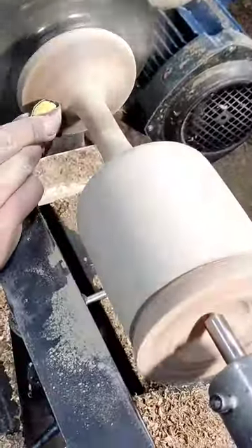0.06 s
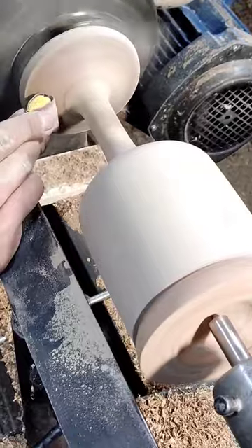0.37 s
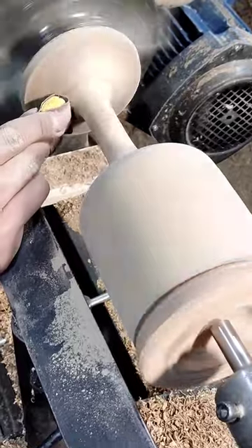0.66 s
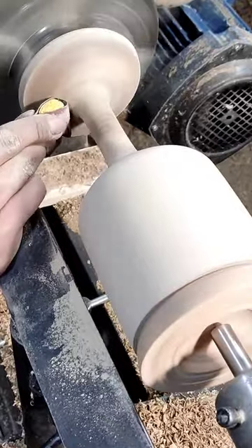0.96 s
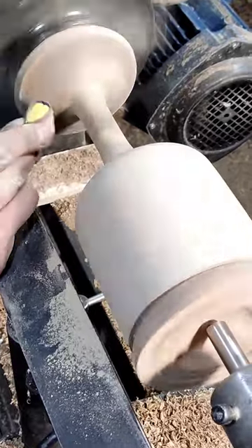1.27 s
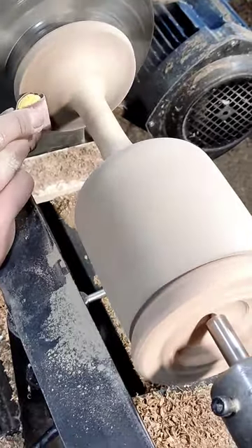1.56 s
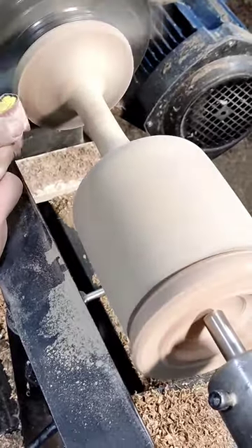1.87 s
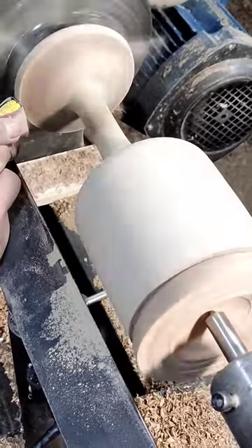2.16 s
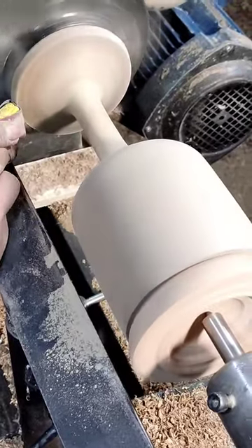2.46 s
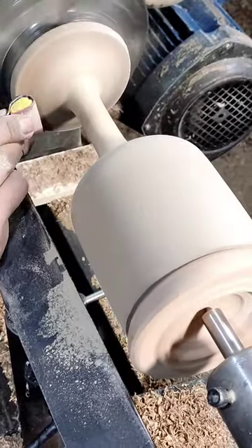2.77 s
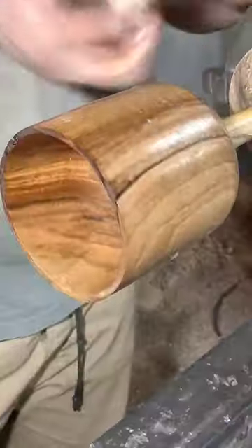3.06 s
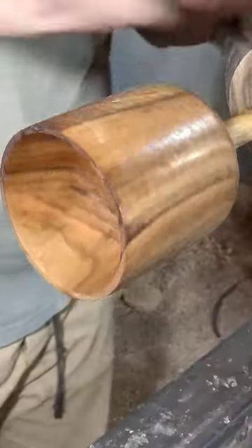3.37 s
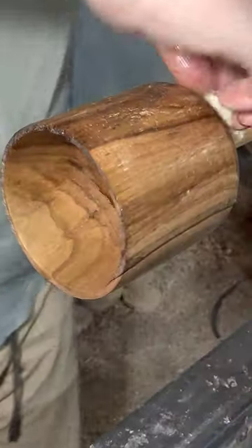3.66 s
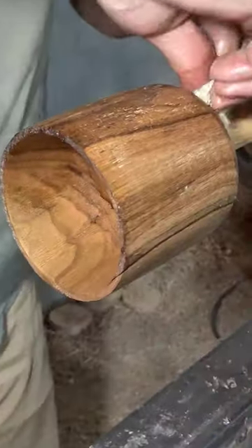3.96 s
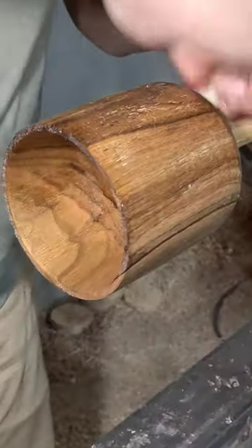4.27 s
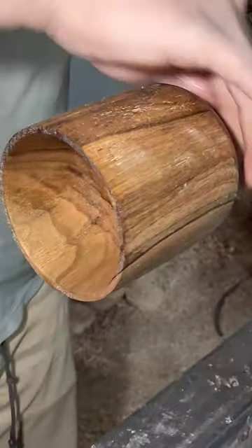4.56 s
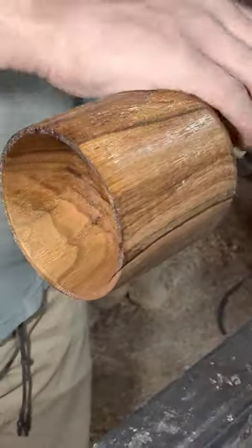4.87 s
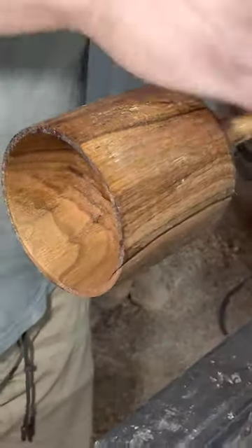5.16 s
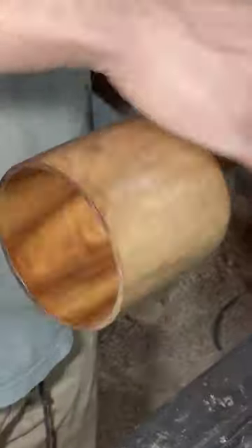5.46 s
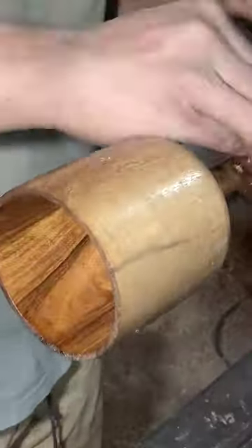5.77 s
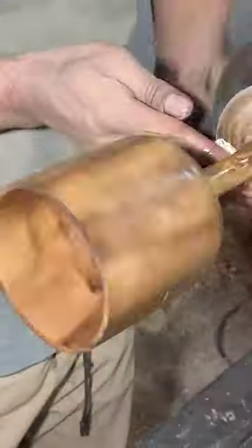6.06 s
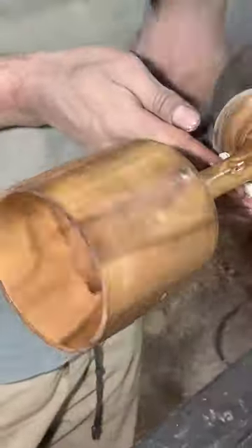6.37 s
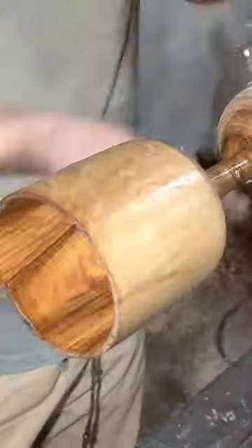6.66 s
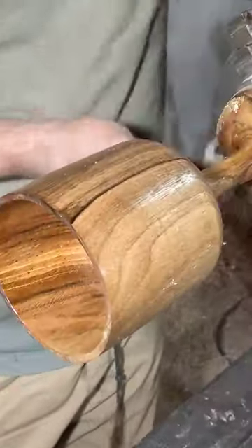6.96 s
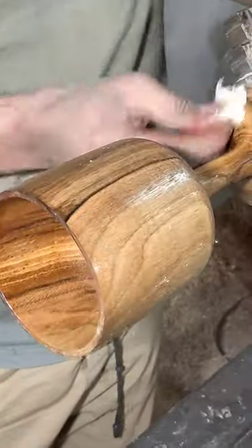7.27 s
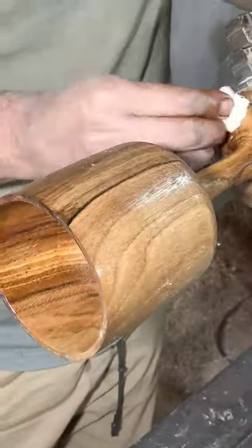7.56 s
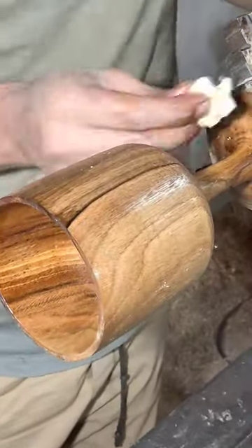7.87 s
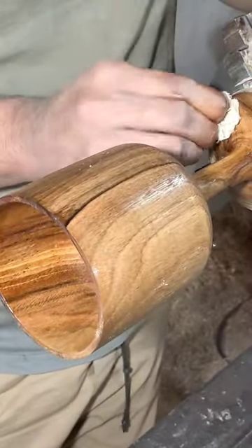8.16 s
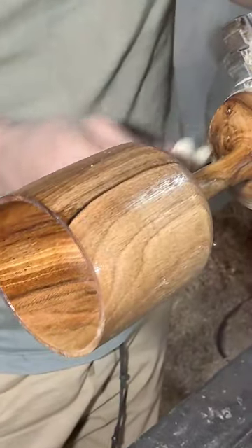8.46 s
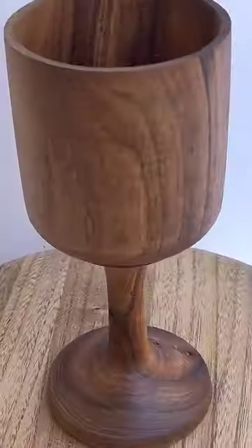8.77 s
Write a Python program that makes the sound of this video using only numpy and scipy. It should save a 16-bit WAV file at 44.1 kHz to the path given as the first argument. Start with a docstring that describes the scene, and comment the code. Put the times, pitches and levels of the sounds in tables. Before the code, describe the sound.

In a woodturning workshop, an abrasive strip hisses and rasps against a goblet spinning on a lathe, over the machine's throbbing drone and thin whine. After about three seconds this cuts to a quiet room. Close by, a palm rubs the wood and a cloth pad wipes on finish in short, soft swishes, with small clicks of fingers and nails. A low rumble and faint whine come in at the very end.

```python
"""A woodturning workshop, in three scenes. An abrasive strip is pressed to a goblet spinning on a lathe:
grit catches the wood, swelling once a turn, over the ringing, throbbing drone of the machine.
Then the room is quiet: a palm slows the goblet and a cloth pad wipes finish on, with small taps of
fingers and nails. Last, the finished goblet stands in a low rumble and a thin whine."""
import sys
import numpy as np
from scipy import signal
from scipy.fft import rfft, irfft
from scipy.io import wavfile
from scipy.ndimage import uniform_filter1d

SR = 44100
rng = np.random.default_rng(int(sys.argv[2]) if len(sys.argv) > 2 else 0)


def dump(signal):
    """Clip the signal to [-1, 1] and save it as 16-bit WAV at the path in sys.argv[1]."""
    limited = np.clip(np.atleast_2d(signal).T, -1, 1)
    pcm = np.round(limited * 32767).astype(np.int16)
    wavfile.write(sys.argv[1], SR, pcm)


N = 397341
T = np.arange(N) / SR
HZ = np.fft.rfftfreq(N, 1 / SR)
LATHE_END_S, WIPING_END_S = 3.123, 8.783


def gain_of(db):
    """Decibels to amplitude."""
    return 10 ** (np.asarray(db) / 20)


def unit_rms(x):
    """Scales to rms 1."""
    return x / np.sqrt(np.mean(x ** 2) + 1e-20)


def over_hz(points):
    """Curve interpolated over log frequency."""
    f, value = np.transpose(points)
    return np.interp(np.log(HZ + 1), np.log(f + 1), value)


def spectrum(points):
    """dB curve as gain over frequency."""
    return gain_of(over_hz(points))


def over_time(points):
    """Curve interpolated over time."""
    return np.interp(T, *np.transpose(points))


def resonances(modes):
    """Gain over frequency of steep-skirted modes: f/Hz, width/Hz, level/dB."""
    return together(gain_of(db) / (1 + ((HZ - hz) / width) ** 2) ** 1.39 for hz, width, db in modes)


def colour(x, gain):
    """Filters by a gain over frequency, to rms 1."""
    return unit_rms(irfft(rfft(x) * gain, N))


def white():
    """Two channels of independent noise."""
    return rng.standard_normal((2, N))


def wander(rate_hz):
    """Random drift, rms 1."""
    return colour(rng.standard_normal(N), 1 / (1 + (HZ / rate_hz) ** 4))


def tone(hz, waver, rate_hz):
    """Sine whose pitch wavers by a small fraction."""
    return np.sin(2 * np.pi * np.cumsum(hz * (1 + waver * wander(rate_hz))) / SR)


def held(start, length, attack_s, release_s):
    """Attack, hold, release: 0 to 1 and back."""
    return np.clip(np.minimum((T - start) / attack_s, (start + length - T) / release_s) + .5, 0, 1)


def arch(start, length):
    """Rounded swell: 0 to 1 and back."""
    return np.sqrt(np.sin(np.pi * np.clip((T - start) / length, 0, 1)).clip(0))


def together(gains):
    """Power sum of unrelated levels."""
    return np.sqrt(sum(g ** 2 for g in gains))


def blows(times, dbs, rise_s, t60_s, carrier=1):
    """Fast-rising, decaying impacts: envelopes, or rings if given a carrier."""
    hits = np.zeros(N)
    hits[np.round(times * SR).astype(int)] = gain_of(dbs)
    shape = (1 - np.exp(-T / rise_s)) * gain_of(-60 * T / t60_s) * carrier
    return signal.oaconvolve(hits, shape[:SR // 2])[:N]


def grains(per_s, spread_db, decay_s=0.0006):
    """Tiny noise bursts of uneven size at random times."""
    size = gain_of(spread_db * np.minimum(rng.exponential(1, N), 4))
    caught = rng.random(N) < per_s / SR
    power = signal.lfilter([1], [1, -np.exp(-1 / (decay_s * SR))], (size * caught) ** 2)
    return unit_rms(np.sqrt(power) * white())


def shifting(x, depth_db):
    """Colour drifts in random patches."""
    z = signal.stft(x, nperseg=512, noverlap=384)[2]
    patches = uniform_filter1d(rng.standard_normal(z.shape[1:]), size=8, axis=0)
    patches = unit_rms(uniform_filter1d(patches, size=22, axis=1))
    return signal.istft(z * gain_of(depth_db * patches), nperseg=512, noverlap=384)[1][:, :N]


def reflections(x, echo_db, count=12, span_s=0.005):
    """Faint echoes off nearby hard surfaces ripple each channel's spectrum."""
    echo = np.zeros((2, SR // 10))
    delays = (rng.uniform(0.0011, span_s, (2, count)) * SR).astype(int)
    gains = gain_of(echo_db) * rng.choice([-1, 1], delays.shape) / np.sqrt(count)
    np.put_along_axis(echo, delays, gains, 1)
    echo[:, 0] = 1
    return signal.oaconvolve(x, echo / np.linalg.norm(echo[0]), axes=1)[:, :N]


def panned(db):
    """Channel gains for an L-R level difference."""
    return gain_of(np.vstack([db, -db]) / 2)


def stereo(x, correlation, balance=((100, 0), (10000, 0))):
    """Blends two unrelated signals to a correlation and L-R balance over frequency."""
    a, b = rfft(x)
    likeness = over_hz(correlation)
    common, apart = a * np.sqrt(1 + likeness), b * np.sqrt(1 - likeness)
    channels = np.array([common + apart, common - apart]) * panned(over_hz(balance))
    return irfft(channels, N) / np.sqrt(2)


def low_pass(x, edge_hz):
    """Steep band limit."""
    return signal.oaconvolve(x, signal.firwin(511, edge_hz, window=("kaiser", 9), fs=SR)[None], "same")


def once_a_turn(depth, spin_hz=43.06):
    """The piece runs slightly out of true, so the load swells every turn."""
    return 1 + depth * np.cos(2 * np.pi * spin_hz * T)


# Room air: f/Hz, rel. level/dB
ROOM_SPECTRUM = [(12, -47), (20, 5), (46, 1), (124, -9.5), (189, -9), (242, -12), (347, -23), (571, -27),
                 (1170, -23), (2410, -30.5), (3010, -51), (10200, -40), (15000, -36.5)]
# Deep rumble: t/s, rel. level/dB
ROOM_RUMBLE = [(3.15, -45.5), (4.5, -44), (5.2, -50), (5.75, -44), (7.0, -51.5), (8.75, -47)]
# Room stereo field: f/Hz, L-R correlation
ROOM_CORRELATION = [(60, 0.79), (280, 0.93), (640, 0.42), (1400, -0.14), (3000, -0.029), (15000, -0.052)]


def room_air():
    """Still air over a slowly varying deep rumble."""
    air = spectrum(ROOM_SPECTRUM)
    rumble = gain_of(over_time(ROOM_RUMBLE) - 7.5) * colour(white(), air / (1 + (HZ / 130) ** 4))
    steady = gain_of(-56) * colour(white(), air)
    return stereo(rumble + steady, ROOM_CORRELATION)


# Air around the finished goblet: f/Hz, rel. level/dB
CLOSING_AIR = [(35, -34), (60, -11), (174, -9.5), (246, -22), (324, -17.5), (381, -26.5), (440, -17),
               (520, -27.5), (1420, -30), (2590, -29), (3190, -32), (13100, -45.5), (15000, -77)]
# Steady hum: f/Hz, level/dB
CLOSING_HUM = [(97, -61), (167.5, -64)]
# Whine bands: f/Hz, width/Hz, rel. level/dB
WHINE_BANDS = [(1710, 120, -9), (1945, 73, -7), (2610, 29, -7), (2545, 21, 5), (2700, 65, -10.5),
               (3870, 80, -12), (4100, 90, -10)]
# Air and whine balance: f/Hz, L-R/dB
CLOSING_BALANCE = [(500, 0.5), (1200, -1), (2000, -6), (2550, -9.5), (3000, -4), (3850, -1), (4150, -4),
                   (6500, -1)]
# Swells of the whine: t/s, length/s, level/dB
SQUEALS = [(8.938, 0.022, -52.5), (8.976, 0.031, -50.5)]
# Their partials: f/Hz, rel. level/dB
SQUEAL_PARTIALS = [(1995, -15), (2550, -1.5), (3850, -19), (4150, -19)]


def closing_ambience(throb_hz=28.3):
    """Deep throb, faint hum and air; a thin whine on the right swells twice."""
    phase = 2 * np.pi * np.cumsum(throb_hz * (1 + 0.04 * wander(rate_hz=17))) / SR
    throb = gain_of(-30) * (np.cos(phase) + 0.18 * np.cos(2 * phase))
    hum = sum(gain_of(db) * np.sin(2 * np.pi * hz * T) for hz, db in CLOSING_HUM)
    air = gain_of(-50) * colour(white(), spectrum(CLOSING_AIR))
    whine = gain_of(-59 + 2.6 * wander(rate_hz=39)) * colour(white(), resonances(WHINE_BANDS))
    swells = together(gain_of(db) * arch(s, length) for s, length, db in SQUEALS)
    squeal = swells * sum(gain_of(db) * tone(hz, waver=0.00394, rate_hz=62) for hz, db in SQUEAL_PARTIALS)
    return throb + hum + panned(-14) * squeal + stereo(air + whine, ROOM_CORRELATION, CLOSING_BALANCE)


def dull_click(at_s=8.779):
    """One tiny click as the last scene opens."""
    return blows(np.array([at_s]), dbs=-50, rise_s=0.00003, t60_s=0.003)


# Spindle rumble: f/Hz, rel. level/dB
SPINDLE_SPECTRUM = [(90, -26), (180, 5), (240, -9.5), (300, 3), (390, 0), (520, -9), (900, -19),
                    (1400, -38)]
# Hand pushes: t/s, length/s, rel. level/dB
SPINDLE_PUSHES = [(3.05, 0.19, -58), (3.677, 0.35, -59.5), (3.95, 0.27, -62), (4.802, 0.29, -57),
                  (5.746, 0.74, -61), (6.546, 0.19, -59), (6.924, 0.085, -58), (7.28, 0.13, -63)]
# Bearing hums: start t/s, end t/s, f/Hz, width/Hz, level/dB
BEARING_HUMS = [(3.0, 3.449, 201, 13, -56.5), (3.0, 3.482, 410, 9.8, -60.5), (3.922, 4.35, 370, 33, -56),
                (4.052, 4.35, 188, 3, -59), (3.91, 4.7, 62.4, 9.4, -56), (4.85, 5.21, 207, 8, -60.5),
                (4.877, 5.2, 383, 20, -61), (5.948, 6.45, 375, 25, -64), (7.53, 8.196, 640, 27, -72)]


def spindle():
    """Rolls softly, louder at each push; the bearings hum as it coasts or is nudged."""
    pushes = together(gain_of(db) * arch(s, length) for s, length, db in SPINDLE_PUSHES)
    level = gain_of(2) * np.hypot(gain_of(-63), pushes)
    out = stereo(level * colour(white(), spectrum(SPINDLE_SPECTRUM)), ROOM_CORRELATION)
    for start, end, hz, width, db in BEARING_HUMS:
        ring = colour(rng.standard_normal(N), resonances([(hz, width, 0)]))
        out += gain_of(db) * arch(start, end - start) * ring
    return out


# Light contact between strokes: t/s, cloth rel. level/dB, skin rel. level/dB
RESTING_CONTACT = [(3.15, -57.5, -55), (3.9, -62, -59), (4.3, -69, -68), (4.7, -71, -67.5), (5.1, -71, -66),
                   (5.5, -63, -62.5), (5.97, -66, -63.5), (6.5, -62, -65), (6.83, -66, -64),
                   (7.07, -74, -67), (7.6, -64.5, -65.5), (8.1, -70, -67.5), (8.75, -72.5, -67.5)]
# Palm rubs: t/s, length/s, rel. level/dB
PALM_RUBS = [(3.207, 0.57, -44), (3.56, 0.36, -52.5), (4.387, 0.19, -65), (4.857, 0.39, -60.5),
             (5.455, 0.43, -56), (6.03, 0.92, -58.5), (6.28, 0.51, -55.5), (6.575, 0.44, -57.5),
             (7, 0.05, -63), (7.464, 0.52, -61.5), (7.761, 0.34, -60), (8.386, 0.16, -60)]
# Skin friction: f/Hz, rel. level/dB
SKIN_SPECTRUM = [(400, -2), (900, -11), (1500, 3.5), (2300, 6), (3500, 3), (6000, 0), (12000, -9.5)]
# Coupling of palm to cup: t/s, gain/dB
GRIP = [(3.4, -21.5), (4.5, -1.5), (6.4, -6), (8.5, -20)]


def palm(rise_share=0.18, fade_db=-35):
    """Skin bears down, then each rub fades as the cup slows; the hollow cup sounds beneath."""
    rubs = []
    for start, length, db in PALM_RUBS:
        progress = np.clip((T - start) / length, 0, 3)
        fading = np.maximum(progress - rise_share, 0) / (1 - rise_share)
        rubs.append(np.minimum(progress / rise_share, 1) * gain_of(db + fade_db * fading))
    resting_db = over_time([(s, db) for s, _, db in RESTING_CONTACT])
    level = np.hypot(together(rubs), gain_of(resting_db))
    cup = gain_of(over_time(GRIP)) * colour(white(), resonances([(684, 290, -0.5), (873, 29, 0.5)]))
    friction = white() + 0.45 * grains(per_s=160, spread_db=3)
    skin = gain_of(-0.5) * colour(friction, spectrum(SKIN_SPECTRUM))
    return level * (skin + cup)


# Pad strokes: t/s, length/s, rel. level/dB, attack/s
PAD_STROKES = [(3.22, 0.16, -52, .016), (3.637, 0.15, -56, .02), (3.926, 0.048, -56, .012),
               (3.982, 0.066, -53.5, 0.018), (4.04, 0.054, -58, .01), (4.142, 0.04, -53.5, .02),
               (4.391, 0.065, -51, 0.007), (4.64, 0.083, -60, 0.0055), (4.746, 0.11, -51.5, 0.031),
               (4.862, 0.073, -54, .012), (4.938, 0.046, -62, 0.0092), (5.018, 0.05, -58.5, 0.024),
               (5.193, 0.026, -60, 0.0048), (5.283, 0.033, -58, 0.0089), (5.35, 0.13, -56.5, .03),
               (5.482, 0.06, -51, .008), (5.565, 0.03, -57, .007), (5.612, 0.13, -53, .006),
               (5.85, 0.022, -57, .015), (6.001, 0.036, -52, .005), (6.065, 0.085, -54.5, 0.022),
               (6.166, 0.04, -57, .007), (6.318, 0.094, -56, .016), (6.363, 0.016, -54, .004),
               (6.49, 0.024, -55, 0.018), (6.575, 0.18, -64, 0.023), (6.868, 0.041, -61, 0.0044),
               (6.93, 0.038, -59, 0.013), (7.007, 0.028, -51, 0.018), (7.1, 0.034, -59, .003),
               (7.2, 0.045, -61, .015), (7.244, 0.042, -53.5, .014), (7.325, 0.031, -57.5, .006),
               (7.37, 0.02, -60, .01), (7.542, 0.16, -64, 0.028), (7.763, 0.11, -57.5, 0.035),
               (7.894, 0.036, -60.5, 0.0054), (8.301, 0.04, -62, 0.016), (8.391, 0.07, -47.5, 0.018)]
# Swish: f/Hz, rel. level/dB
SWISH_SPECTRUM = [(900, -19), (1500, -16), (3300, -11.5), (4300, -3), (5500, -1), (8000, -3), (9200, 0.5),
                  (10800, -1), (12000, -6.5), (15000, -15)]
# Swish resonances: f/Hz, width/Hz, rel. level/dB
SWISH_PEAKS = [(6900, 300, -1), (8070, 1100, 3), (9740, 760, -2.5)]
# Dry pad fizz: f/Hz, rel. level/dB
FIZZ_SPECTRUM = [(8000, -30), (11500, 0), (13000, 1), (15000, -4)]
# Fizz envelope: t/s, rel. level/dB
FIZZ_ENVELOPE = [(6.7, -22), (7.0, -13), (7.4, -14), (7.8, -19), (8.35, -7)]


def cloth_pad(release_s=0.012):
    """Fibres slide and catch on the wood in short strokes over a light, uneven contact."""
    strokes = together(gain_of(db) * held(s, length, attack_s, release_s)
                       for s, length, db, attack_s in PAD_STROKES)
    resting_db = over_time([(s, db) for s, db, _ in RESTING_CONTACT])
    level = np.hypot(strokes, gain_of(resting_db + 2.2 * wander(rate_hz=9.4)))
    fibres = unit_rms(white() + 0.7 * grains(per_s=940, spread_db=2))
    fibres *= gain_of(0.96 * wander(rate_hz=16))
    fibres = shifting(reflections(fibres, echo_db=-9), depth_db=2.4)
    swish = gain_of(-0.5) * colour(fibres, np.hypot(spectrum(SWISH_SPECTRUM), resonances(SWISH_PEAKS)))
    fizz = gain_of(over_time(FIZZ_ENVELOPE)) * colour(fibres, spectrum(FIZZ_SPECTRUM))
    return level * (swish + fizz)


# Taps: t/s, click, knock and thud rel. level/dB, ring f/Hz
FINGER_TAPS = [(3.39, -37.5, -58, -65, 8250), (3.603, -45.5, -62, -65, 8340), (3.930, -53, -64, -65, 3500),
               (4.193, -52, -66, -72, 8000), (4.399, -49, -56, -65, 7700), (4.873, -34, -46, -60, 6400),
               (4.918, -51, -70, -68, 8000), (5.614, -43.5, -55.5, -65, 6770), (5.797, -49, -62, -65, 9900),
               (6.2912, -40.5, -49, -36.5, 6890), (6.352, -45, -73, -60, 9890),
               (6.363, -45, -72, -66, 5500), (6.369, -44.5, -69, -60, 3360), (6.376, -46, -72, -68, 5500),
               (6.452, -55, -72, -68, 6000), (6.6577, -35, -69, -62, 8090), (6.733, -50, -66, -68, 5730),
               (6.873, -47.5, -61, -62, 10500), (7.028, -51, -82, -62, 6960),
               (7.099, -56, -75, -72.5, 4500), (7.571, -57, -76, -72, 8000), (7.894, -59, -74, -72, 9500),
               (7.969, -55, -62, -70, 9650), (8.399, -45, -68, -68, 9000)]
# Dry click: f/Hz, rel. level/dB
CLICK_SPECTRUM = [(500, -11), (1200, -20), (3000, -10), (5000, -2), (6600, 2.5), (8500, -1), (11000, -3),
                  (15000, -32)]
# Hollow cup: f/Hz, width/Hz, rel. level/dB
GOBLET_MODES = [(301, 75, 6), (425, 90, -8), (694, 90, -13), (860, 48, 4), (935, 35, -2), (1015, 53, -1.5),
                (1284, 153, -4)]
# Balance of all hand sounds: f/Hz, L-R/dB
HAND_BALANCE = [(200, 2), (700, -0.5), (1500, 4), (4400, 1.5), (6800, 0.5), (7800, -4), (8800, -2),
                (10200, 11), (11300, 7.5), (12500, 2), (15000, 8)]


def taps(ring_width_hz=470):
    """Fingers and nails hit the goblet: ringing click, hollow knock, thud through the spindle."""
    s, click_db, knock_db, thud_db, ring_hz = np.transpose(FINGER_TAPS)
    snap = blows(s, click_db, rise_s=0.002, t60_s=0.013)
    tail = 0.068 * blows(s, click_db, rise_s=0.0031, t60_s=0.12)
    latest_tap = np.maximum(np.searchsorted(s, T) - 1, 0)
    carrier = np.sin(2 * np.pi * np.cumsum(ring_hz[latest_tap]) / SR)
    ring = gain_of(-2) * unit_rms(colour(white(), resonances([(0, ring_width_hz, 0)])) * carrier)
    click = gain_of(11) * (snap + tail) * unit_rms(colour(white(), spectrum(CLICK_SPECTRUM)) + ring)
    knock = blows(s, knock_db, rise_s=0.00079, t60_s=0.23) * colour(white(), resonances(GOBLET_MODES))
    thud = blows(s, thud_db, rise_s=0.0009, t60_s=0.14, carrier=np.sin(2 * np.pi * 48 * T))
    return stereo(click + knock, ROOM_CORRELATION, HAND_BALANCE) + thud


# Motor pitch: t/s, f/Hz
MOTOR_GLIDE = [(0.0, 906.0), (0.27, 898), (0.49, 903.9), (0.65, 884), (0.76, 901.2), (1.12, 893.9),
               (1.46, 904), (1.66, 892), (2.28, 899), (2.48, 892), (2.63, 901.4), (2.86, 892), (3.11, 896)]


def motor():
    """A whine from the right, wavering with the load."""
    return panned(-18) * gain_of(-41) * tone(over_time(MOTOR_GLIDE), waver=0.00599, rate_hz=12.01)


# Lathe throbs: centre t/s, length/s, low and high tone rel. level/dB, low and high tone f/Hz
LATHE_THROBS = [(0.056, 0.12, -32, -30, 272, 354), (0.192, 0.14, -34, -37, 269, 351),
                (0.36, 0.088, -37.5, -48, 268, 362), (0.597, 0.11, -29.5, -28.5, 264, 352),
                (0.79, 0.21, -26, -28.5, 261, 354), (0.976, 0.27, -37.5, -29.5, 269, 358),
                (1.17, 0.097, -29, -23, 268, 359), (1.453, 0.11, -23.5, -31, 264, 352),
                (1.576, 0.035, -30, -33, 269, 354), (1.811, 0.26, -30, -28.5, 264, 353),
                (2.002, 0.065, -27, -24.5, 269, 356), (2.251, 0.15, -26.5, -36, 265, 360),
                (2.517, 0.24, -34, -31, 264, 358), (2.683, 0.19, -34, -32, 269, 358),
                (2.905, 0.09, -23, -27, 270, 354), (2.978, 0.09, -28, -32.5, 265, 353),
                (3.082, 0.11, -31.5, -35.5, 260.3, 349)]


def throbbing(waver=0.0081, top_hz=440.4, rough_db=1.6):
    """Three rough machine tones swell a few times a second; the lower two shift pitch each time."""
    centres, lengths, low_db, high_db, low_hz, high_hz = np.transpose(LATHE_THROBS)
    swells = np.array([arch(s - length / 2, length) for s, length in zip(centres, lengths)])
    low_level = together(gain_of(low_db)[:, None] * swells)
    high_level = together(gain_of(high_db)[:, None] * swells)
    low = tone(np.interp(T, centres, low_hz), waver, rate_hz=17.4)
    high = tone(np.interp(T, centres, high_hz), waver, rate_hz=26)
    top = gain_of(-9) * tone(top_hz, waver=0.025, rate_hz=20)
    roughness = gain_of(rough_db * wander(rate_hz=30))
    return np.sqrt(2) * (low_level * low + high_level * (high + top)) * roughness


# Bed, housing and motor modes: f/Hz, width/Hz, rel. level/dB
MACHINE_MODES = [(102, 27, -13), (141.8, 26, -8), (206, 19, -10), (271, 34, -4), (320, 16, -13),
                 (356, 21.5, -4.5), (437, 31, -7.5), (692, 58, -12), (696, 57, -10.5), (790, 88, -14),
                 (1085, 11, -14), (1371, 60, -14.5), (1520, 35, -15.5), (1700, 51, -22), (2110, 110, -18),
                 (2637, 50, -15)]
# Bearing and belt rumble: f/Hz, rel. level/dB
BEARING_SPECTRUM = [(20, -46.5), (55, -25), (90, -23), (500, -16.5), (1200, -34.5), (2100, -21.5),
                    (3200, -56), (8000, -24), (14000, -56)]
# Drone envelope: t/s, rel. level/dB
DRONE_ENVELOPE = [(0.0, -26.5), (0.47, -27.5), (0.77, -25), (1.18, -25.5), (1.3, -27), (1.85, -25.5),
                  (2.12, -27.5), (2.83, -28), (2.9, -27), (3.1, -24)]
# Left-right likeness of the sanding scene, hollow and phasey near 3-4 kHz: f/Hz, L-R correlation
SANDING_CORRELATION = [(60, 1), (400, 0.9), (750, 0.69), (1300, 0.088), (1900, 0.24), (2400, 0.15),
                       (2850, -0.54), (3250, -0.18), (3600, -0.98), (4200, 0.12), (8000, -0.2),
                       (8900, -0.046), (9400, -0.2), (10150, 0.32), (10600, 0)]
# Balance of the sanding scene: f/Hz, L-R/dB
SANDING_BALANCE = [(100, -1.5), (400, -2), (560, -4.5), (720, -1), (900, -3), (1100, -2), (3200, 1.5),
                   (4800, -2.5), (6100, 0), (7300, -4), (8500, 0.5), (9500, 6.5), (11000, 5.5), (12500, 6),
                   (13500, 0.5)]


def lathe(free_run_db=2):
    """Bearings and belt shake the machine into ringing, louder when the strip eases off."""
    shake = white() * once_a_turn(depth=0.1)
    body = colour(shake, np.hypot(resonances(MACHINE_MODES), spectrum(BEARING_SPECTRUM)))
    drone = gain_of(over_time(DRONE_ENVELOPE) + free_run_db * (1 - pressure())) * body
    drone[0] += gain_of(-2) * throbbing()  # row 0 becomes common to both channels
    return stereo(drone, SANDING_CORRELATION, SANDING_BALANCE)


# Fingers ease the strip off: t/s, length/s, gain/dB, ramp/s
STRIP_EASINGS = [(0.17, 0.021, -6.5, 0.018), (0.264, 0.029, -4.5, 0.023), (0.381, 0.029, -3.5, 0.017),
                 (0.481, 0.014, -6.5, 0.026), (1.363, 0.071, -14, 0.036), (1.789, 0.05, -22, 0.013),
                 (1.949, 0.065, -20.5, 0.02)]


def pressure():
    """Load of strip on wood: 1 at full contact, less at each easing."""
    return gain_of(sum(db * held(s, length, ramp_s, ramp_s) for s, length, db, ramp_s in STRIP_EASINGS))


# Strip tilt: t/s, tilt (0 flat, 1 on edge)
STRIP_TILT = [(0.0, 0.31), (0.55, 0.3), (0.95, 0.06), (1.28, 0.24), (1.5, 0.29), (1.97, 0.51), (2.05, 0.61),
              (2.4, 0.69), (2.7, 0.68), (2.78, 0.32), (3.0, 0.25)]
# Harder bites of grit: t/s, length/s, gain/dB
GRIT_BITES = [(0.123, 0.021, 3.5), (0.15, 0.0093, 2), (0.23, 0.021, 3.5), (0.31, 0.048, 2),
              (0.357, 0.011, 1), (0.518, 0.067, 2), (1.213, 0.042, 2), (1.932, 0.015, 6), (2.705, 0.006, 5),
              (3.108, 0.011, 3)]
# Grit hiss: f/Hz, rel. level/dB
HISS_SPECTRUM = [(2800, -39.5), (3600, -35), (5000, -3.5), (6000, -3), (7200, -1.5), (8200, 0), (9000, 2),
                 (9600, 2), (10100, -1.5), (10700, -1.5), (11500, -1), (12300, -1.5), (13200, 0.5),
                 (14100, -5)]
# Peaks in the grit hiss: f/Hz, width/Hz, rel. level/dB
HISS_PEAKS = [(9510, 510, 7.5), (9930, 480, -0.5), (11800, 450, -7)]
# Sizzle of the biting edge: f/Hz, rel. level/dB
SIZZLE_SPECTRUM = [(5000, -28.5), (7300, 3.5), (8500, 2), (9700, 5), (10700, -7.5), (12300, -2.5),
                   (13200, 0), (14100, -1.5)]
# Wood under the grit: f/Hz, rel. level/dB
SCRAPE_SPECTRUM = [(400, -13.5), (900, -0.5), (1250, -4.5), (1600, -2), (2150, 0.5), (2600, -3), (3050, -6),
                   (3800, -1), (6000, -14.5), (10000, -46)]
# Grainy, flickering band around 4-6 kHz: f/Hz, rel. level/dB
FLICKER_SPECTRUM = [(2500, -23), (3300, -14), (3900, 4), (4700, -9), (5800, 3), (7000, -7), (9000, -27)]


def sanding(bite_ramp_s=0.005, brush_db=-49.5):
    """Grit catches wood thousands of times a second; on edge the strip hisses more, scrapes less."""
    tilt = over_time(STRIP_TILT)
    bites_db = sum(db * held(s, length, bite_ramp_s, bite_ramp_s) for s, length, db in GRIT_BITES)
    force = pressure() * gain_of(bites_db + 0.97 * wander(rate_hz=24))  # fingers press unevenly
    contact = once_a_turn(depth=0.1)
    chatter = gain_of(0.24 * wander(rate_hz=170))
    catches = unit_rms(white() + 0.64 * grains(per_s=3700, spread_db=1.5)) * contact * chatter
    catches = shifting(reflections(catches, echo_db=-13), depth_db=1.5)

    hiss_level = np.hypot(force * gain_of(-20.5 + 3 * tilt), gain_of(brush_db))  # eased, it still brushes
    hiss = colour(catches, np.hypot(spectrum(HISS_SPECTRUM), resonances(HISS_PEAKS)))
    sizzle = gain_of(-23 + 23 * tilt) * colour(catches, spectrum(SIZZLE_SPECTRUM))
    scrape_level = gain_of(-25 - 9 * tilt + 1.1 * wander(rate_hz=23)) * once_a_turn(depth=0.07)
    scrape = scrape_level * colour(catches, spectrum(SCRAPE_SPECTRUM))
    flicker = shifting(grains(per_s=1400, spread_db=2.5) * contact, depth_db=2.5)
    flickering = force * gain_of(-33.5 + 0.5 * tilt) * colour(flicker, spectrum(FLICKER_SPECTRUM))
    mix = hiss_level * (hiss + sizzle) + scrape + flickering
    return stereo(mix, SANDING_CORRELATION, SANDING_BALANCE) * panned(1.04 - 4.5 * tilt)


def scene(crossfade_s=0.003):
    """Sanding, wiping and the finished goblet, in turn."""
    machine = low_pass(motor() + lathe() + sanding(), edge_hz=14300)
    wiping = stereo(palm() + cloth_pad(), ROOM_CORRELATION, HAND_BALANCE)
    finishing = room_air() + spindle() + wiping + taps()
    sanded, wiped = (np.clip((T - s) / crossfade_s + .5, 0, 1) for s in (LATHE_END_S, WIPING_END_S))
    return machine * (1 - sanded) + finishing * (sanded - wiped) + closing_ambience() * wiped + dull_click()


def record(dry):
    """Full-scale limit and band limit."""
    return low_pass(np.clip(dry, -1, 1), edge_hz=15330)


dry = scene()
out = record(dry)
dump(out)
```